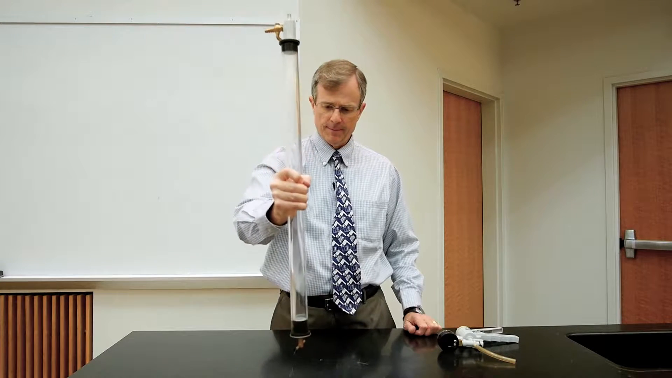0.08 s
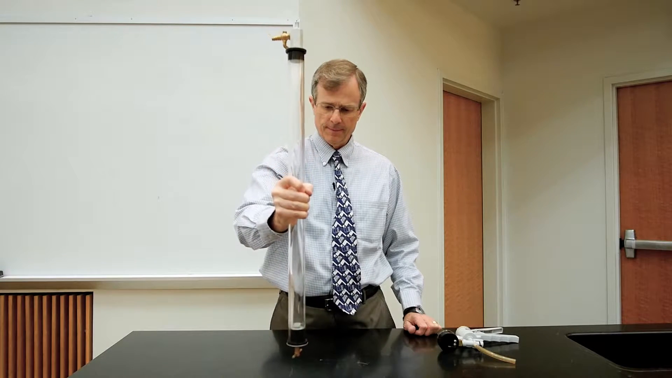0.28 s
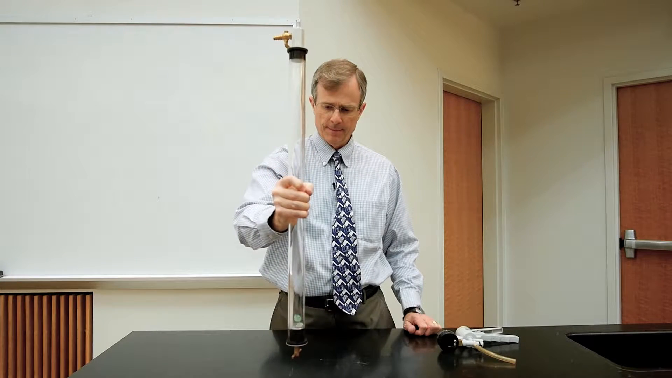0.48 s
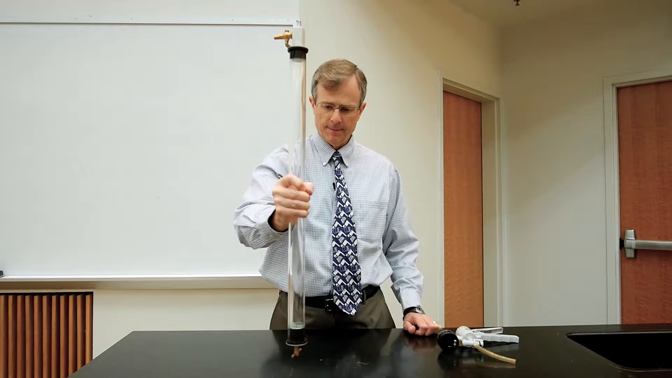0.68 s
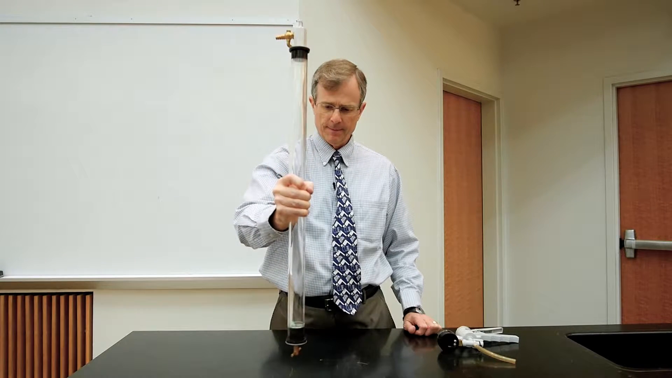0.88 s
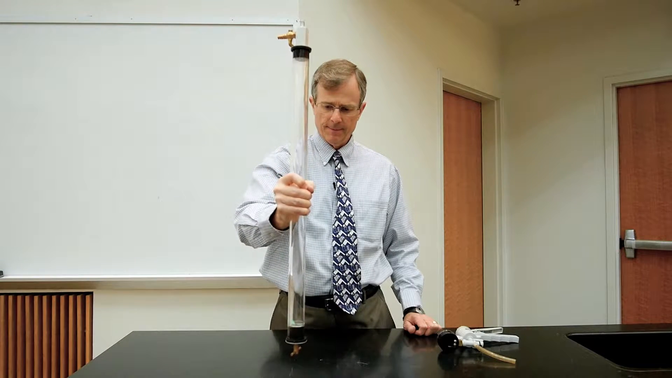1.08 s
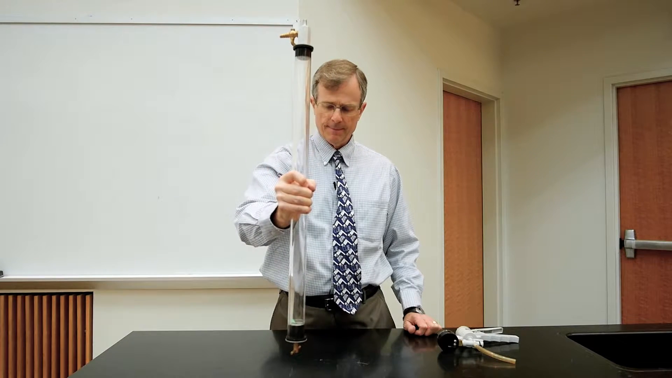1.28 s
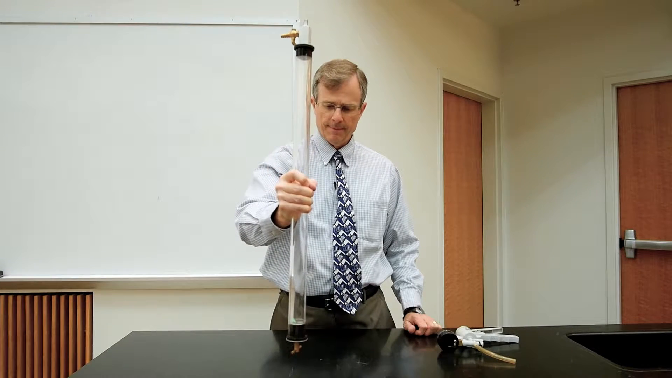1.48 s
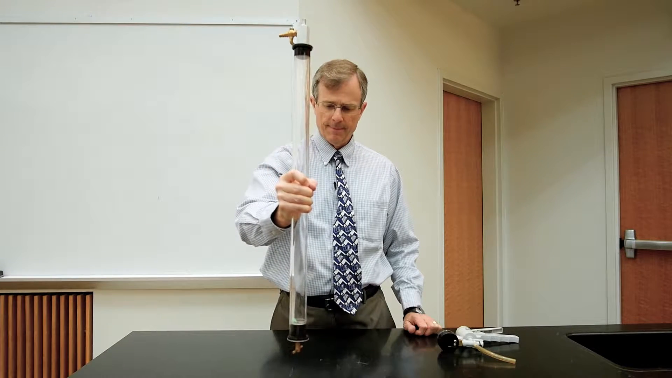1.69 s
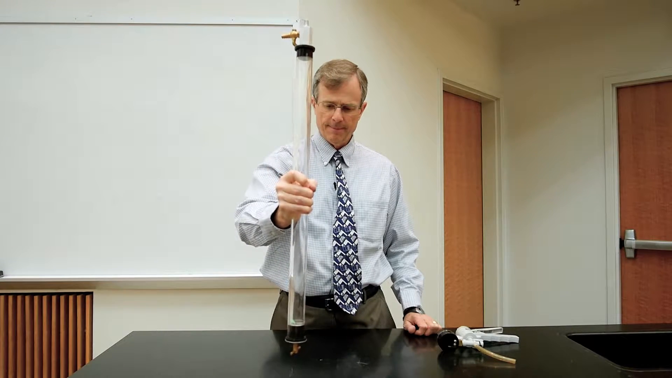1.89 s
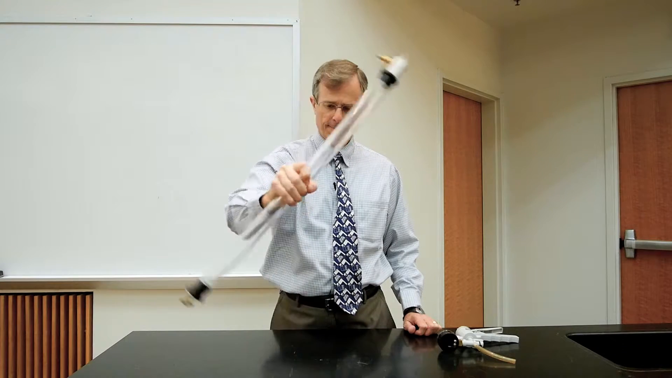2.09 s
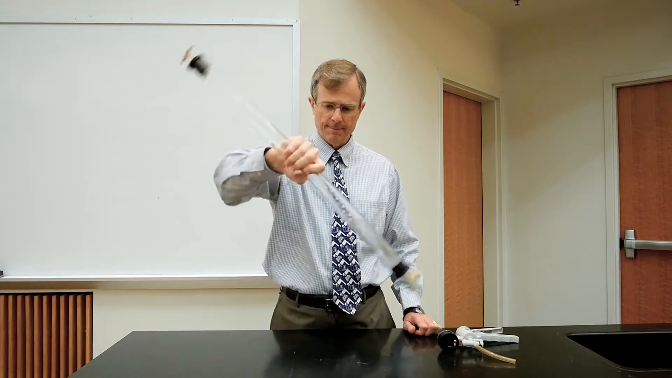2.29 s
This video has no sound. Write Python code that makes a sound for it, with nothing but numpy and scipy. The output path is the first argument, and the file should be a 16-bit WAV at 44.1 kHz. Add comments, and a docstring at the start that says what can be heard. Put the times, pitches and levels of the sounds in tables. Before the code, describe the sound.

A coin and loose bits clack hard, then rattle and click inside a hand-held glass tube

```python
"""Ventilation rumble and hiss, shaped from random noise, lie below a coin and loose pieces in a hand-held glass tube.
Five dull ticks, each a sum of damped modes with a ring near 3 kHz, come first. A hard double blow, bounces and bursts
of small clicks follow: taps ring damped modes of the glass, and some blows also knock the tube's end.
Each contact returns once from the bench and fades in the lecture room as a diffuse tail of decaying noise.
A swish of filtered noise rises to the end as the tube swings."""
import sys
import numpy as np
from scipy import signal
from scipy.fft import rfft, irfft
from scipy.io import wavfile
from scipy.ndimage import uniform_filter1d

SR = 44100
rng = np.random.default_rng(int(sys.argv[2]) if len(sys.argv) > 2 else 0)


def digitize_waveform(pressure):
    """Quantize a signal to 16-bit integers and store it at the path in sys.argv[1].

    Rows of a 2-D input are taken as channels; values are limited to [-1, 1].
    """
    field = np.atleast_2d(pressure).T
    bounded = np.clip(field, -1, 1)
    quanta = np.round(bounded * 32767).astype(np.int16)
    wavfile.write(sys.argv[1], SR, quanta)


def volts_from_decibels(level):
    """Turn decibel levels (scalar or array-like) into linear amplitude factors."""
    exponent = np.asarray(level, float) / 20
    return 10 ** exponent


N = 101430
T = np.arange(N) / SR  # time [s]
CONTACT_S = 0.00009  # rise time of a hard contact on glass
MID_TAP_DB = -28  # strength of the middle tap, the reference for hardness


def set_rms(x, db):
    """Level: scale a signal to an rms value in dB re full scale."""
    return x * volts_from_decibels(db) / np.sqrt(np.mean(x ** 2))


def colour(x, points):
    """Linear filtering: gains at (frequency [Hz], gain [dB]) points, joined along log frequency."""
    hz, db = np.array(points).T
    f = np.arange(len(x) // 2 + 1) * SR / len(x) + 1  # 1 Hz up, to avoid log(0)
    gain_db = np.interp(np.log(f), np.log(hz), db)
    return irfft(rfft(x) * volts_from_decibels(gain_db), len(x))


def walk(rate):
    """Slow fluctuation: random steps, rate per second, smoothed twice to a spread near 0.3."""
    k = int(SR / rate)
    steps = np.repeat(rng.standard_normal(N // k + 1), k)
    smooth = uniform_filter1d(uniform_filter1d(steps, k), k)
    return 0.43 * smooth[:N]


def add(out, sound, s):
    """Superposition: mix a sound in at time s."""
    i = int(s * SR)
    out[i:i + len(sound)] += sound[:N - i]


def strike(modes, contact_s, chance):
    """Modal synthesis: damped sines rise over the contact time, their levels scattered by chance."""
    scatter_db = 2
    # a long first decay gets 35 ms, any other 12 ms
    t = T[:1536] if modes[0][2] > 0.012 else T[:512]
    ring = 0
    for k, (hz, db, t60) in enumerate(modes):
        sign = (-1) ** k
        decay = np.exp(-np.log(1000) * t / t60)
        ring = ring + sign * volts_from_decibels(db + scatter_db * chance[k]) * np.sin(2 * np.pi * hz * t) * decay
    rise = 1 - np.exp(-(t / contact_s) ** 2)
    return rise * ring


def air():
    """Broadband flow noise: ventilation rumble and hiss, gently flickering in level."""
    # Ventilation spectrum: (frequency [Hz], relative density [dB per Hz])
    air_spectrum = [(12, -61), (20, -26), (31, -16.5), (53, -15), (75, 0), (104, -4), (134, -1.5),
                    (216, -2.5), (249, -4), (516, -10.5), (743, -12.5), (1100, -22.5), (3280, -37.5),
                    (14900, -44.5), (16200, -48)]
    air_db, flicker_db = -43, 1.0
    noise = colour(rng.standard_normal(N), air_spectrum)
    return set_rms(noise * volts_from_decibels(flicker_db * walk(6)), air_db)


def swish():
    """Exponential growth of noise: a soft rustle rises steadily in dB as the tube is swung round."""
    # Rustle spectrum: (frequency [Hz], relative density [dB per Hz])
    swish_spectrum = [(500, -12.5), (1500, 6.5), (4000, -5), (9000, -9), (16000, -15)]
    end_db, rise_db_per_s, flicker_db = -57.5, 52, 1.7
    noise = set_rms(colour(rng.standard_normal(N), swish_spectrum), end_db)
    return noise * volts_from_decibels(rise_db_per_s * (T - N / SR) + flicker_db * walk(24.7))


def room(x):
    """Reflection and reverberation: one bench echo and a diffuse tail whose treble lasts longest."""
    # Colour of the room tail: (frequency [Hz], gain [dB])
    tail_colour = [(500, -6), (2000, 2), (5000, -1), (9000, -4.5), (16000, -5)]
    bench_s, bench_db = 0.0016, -20
    t60_s, top_t60_s = 0.5, 0.6  # towards the bass, and at 12 kHz
    tail_db, build_up_s = -22, 0.003
    t = T[:SR // 2]
    tail = 0
    for hz in 500 * 2 ** np.arange(0, 5.1, 0.5):  # half-octave bands
        band_edges = [(hz / 1.42, -40), (hz / 1.15, 0), (hz * 1.15, 0), (hz * 1.42, -40)]
        band = colour(rng.standard_normal(len(t)), band_edges)
        rate = 1 / t60_s + (1 / top_t60_s - 1 / t60_s) * (hz / 12000) ** 2
        tail = tail + band * np.exp(-np.log(1000) * t * rate)
    tail = colour(tail, tail_colour) * (1 - np.exp(-(t / build_up_s) ** 2))
    tail = tail * volts_from_decibels(tail_db) / np.sqrt(np.sum(tail ** 2))  # sets the energy of the response
    bench = volts_from_decibels(bench_db) * np.roll(x, int(bench_s * SR))
    return x + bench + signal.fftconvolve(x, tail)[:N]


def ticks():
    """Soft impact: a longer contact of a softer piece gives dull ticks with a short ring near 3 kHz."""
    # Ticks of the softer piece: (time [s], level [dB], ring frequency [Hz], upper modes [dB])
    tick_events = [(.0088, -54, 3150, -14), (.0214, -40.5, 3150, -4), (.0446, -45, 3050, -1),
                   (.0664, -40.5, 3015, 4.5), (.0933, -40.5, 3010, 0.5)]
    # Upper modes of a tick: (frequency [Hz], relative level [dB], decay time T60 [s])
    upper_modes = [(3630, -1.5, 0.0068), (4530, -4, .005), (5500, -6, .005), (8200, -16, 0.0036)]
    ring_t60_s, contact_s = 0.019, 0.0003
    out = np.zeros(N)
    for s, db, hz, upper_db in tick_events:
        modes = [(hz, 0, ring_t60_s)] + [(f, d + upper_db, t60) for f, d, t60 in upper_modes]
        chance = 0.42 * rng.standard_normal(5)
        add(out, volts_from_decibels(db) * strike(modes, contact_s, chance), s)
    return out


def contact(db, low_db, middle_db, top_db, pitch=1):
    """Modal excitation: the contact point sets each group's share, and hardness brightens the main modes."""
    # Modes of the glass in groups: (frequency [Hz], relative level [dB], decay time T60 [s])
    low_modes = [(3250, -4.5, 0.0057), (4070, -3, 0.0034), (4340, -3.5, 0.0054), (4780, -9, 0.0043)]
    middle_modes = [(5430, -4.5, .007), (6590, -4, 0.0064)]
    main_modes = [(6880, -8.5, .004), (7940, -1, 0.0035), (8520, -2, 0.0038), (9010, 1, 0.0032),
                  (10130, -7, 0.002)]
    top_modes = [(11400, -10, .003), (12000, -2, .003), (13900, -4.5, .003), (15500, -13, .003)]
    # Modes that stop growing once a tap is harder than the middle one, same columns
    soft_modes = [(2480, -10, 0.0044), (15600, -17, 0.0023)]
    tap_gain_db, tilt_per_octave = 5, 1.1  # tilt [dB per octave per dB of hardness]
    hardness_db = db - MID_TAP_DB
    pivot_hz = main_modes[2][0]
    tilted = [(hz, d + tilt_per_octave * hardness_db * np.log2(hz / pivot_hz), t60)
              for hz, d, t60 in main_modes]
    groups = (low_modes, middle_modes, tilted, top_modes, soft_modes)
    shares_db = (low_db, middle_db, 0, top_db, min(0, -hardness_db))
    ring = 0
    for modes, share_db, chance in zip(groups, shares_db, rng.standard_normal((5, 5))):
        pitched = [(hz * pitch, d, t60) for hz, d, t60 in modes]
        ring = ring + volts_from_decibels(share_db) * strike(pitched, CONTACT_S, chance)
    return volts_from_decibels(db + tap_gain_db) * ring


def rattles():
    """Poisson process: sliding, settling pieces make dense faint contacts of random time, size and place."""
    # Bursts: (start [s], length [s], contact rate [per s],
    #          starting level [dB, before the tap gain], top modes [dB])
    bursts = [(0.252, 0.09, 1280, -59, 1), (0.344, 0.039, 1630, -55, -8), (0.381, 0.087, 1600., -58, -26),
              (.497, 0.024, 700., -57, -12), (.556, 0.026, 600., -57.5, -12),
              (0.608, 0.0357, 500., -57.5, -12), (.655, 0.041, 300., -64, -12)]
    fade_db_per_s = 60
    pitch_spread = 0.148  # loose pieces differ in size, so in pitch
    out = np.zeros(N)
    for s, length, rate, db, top_db in bursts:
        times = s + np.cumsum(rng.exponential(1, 120)) / rate
        scatter = 3.3 * rng.standard_normal((120, 3))  # dB
        pitches = 1 - pitch_spread * rng.random(120)
        for at, pitch, (size_db, low, middle) in zip(times, pitches, scatter):
            if at >= s + length:
                break
            click = contact(MID_TAP_DB, low + 1.3, middle + 1.47, top_db, pitch)
            click_db = db + size_db - fade_db_per_s * (at - s)
            add(out, volts_from_decibels(click_db - MID_TAP_DB) * click, at)
    return out


def knocks():
    """Structural excitation: some blows also knock the tube's end, ringing lower modes and a thump."""
    # Knocks: (time [s], level [dB], thump relative to the knock [dB])
    knock_events = [(0.2417, -20.5, 1.5), (0.244, -21.5, -14), (.2777, -16.5, -14), (0.3417, -34.5, -20),
                    (0.568, -44, -12)]
    # Modes of knock and thump: (frequency [Hz], relative level [dB], decay time T60 [s])
    knock_modes = [(900, 0.5, 0.003), (1480, 4.5, 0.0037), (2080, -6, 0.0056)]
    thump_modes = [(357, 0.5, 0.011), (110, -4, 0.019)]
    out = np.zeros(N)
    for s, db, thump_db in knock_events:
        add(out, volts_from_decibels(db + thump_db) * strike(thump_modes, 4 * CONTACT_S, np.zeros(2)), s)
        add(out, volts_from_decibels(db) * strike(knock_modes, 2 * CONTACT_S, rng.standard_normal(3)), s)
    return out


def taps():
    """Impact of hard bodies: separate taps of coin and pieces ring the modes of the glass."""
    # Taps: (time [s], strength [dB, before the tap gain], low modes [dB], middle modes [dB], top modes [dB])
    # The last three tell which modes the contact point drives.
    tap_events = [(0.2422, -13.5, -3.5, -17, -4), (0.243, -19, 0.5, 6, 4), (0.2436, -12.5, -20.5, -7, 0.5),
                  (0.2462, -12.5, -2, -11, -13), (0.2591, -21.5, -29, -3.5, -2), (0.2622, -33, -25, -3, -1),
                  (0.2672, -50, -3, 0.5, 0), (0.2775, -9.5, -5.5, -12, -22.5),
                  (0.2795, -21, -4.5, -10, -18.5), (0.2835, -31, -20, -1, -11), (0.2925, -50, 2, 1, 0),
                  (0.295, -38, 4, -6, -4), (0.298, -42.5, 7.5, -7.5, 14), (0.3337, -22, -11.5, -8, -11),
                  (0.339, -26.5, 0, -5, -7), (0.3403, -28.5, 1, -1, -13.5), (0.3439, -29.5, -21, -18, -9),
                  (0.347, -53, -16, 9, -6), (0.3596, -47, 6, 6, -11), (0.3845, -39.5, -22, -12, -25),
                  (0.4345, -50, -3, -5, -9), (0.4336, -40, -16, -9, -11), (0.4362, -44.5, -7, -9, -13),
                  (0.439, -53.5, -8, -4, -13), (0.4402, -51, -7, -5, -14), (0.442, -50.5, -1, 3, -10.5),
                  (0.4444, -50, 9, 1, -10), (0.499, -39, -15, -8, -15.5), (0.5016, -43, -8, -11, -18),
                  (0.5029, -44, -19.5, -12, -13), (0.506, -41, -17, -8, -9), (0.5085, -39.5, -7, -4, -13),
                  (0.5115, -39, -6.5, -2, -13), (0.5136, -44.5, -8, -7, -12), (0.518, -62, -2, -6, -7),
                  (0.558, -51, -9, -14, -12), (0.5622, -45, -7, -5, -11), (0.564, -42, -15, -7, -11),
                  (0.5701, -28, -9, -5, -11.5), (0.5718, -35, -8, -6, -7), (0.5765, -37.5, -14, -7, -15),
                  (0.5777, -41, -15, -13, -11), (0.5878, -66.5, -6, 4, 3), (0.5997, -57, -5, -11, -10),
                  (0.6032, -66, -16, -12, -8), (0.6112, -62, -2, -3, -5), (0.613, -53, -4, 2, -7),
                  (0.6182, -39, -20, -4, -17), (0.6229, -37, -18, -10, -19), (0.6244, -38.5, -15, -13, -14),
                  (0.6265, -41, -16, -13, -17), (0.6288, -45, -11, -8, -15), (0.6385, -58, -9, -13, -12),
                  (0.6535, -31.5, -25, -7, -19), (0.665, -34, -23, -5, -11),
                  (0.6692, -42.5, -3.5, -10, -13), (0.6736, -43, -14, -12, -11),
                  (0.6842, -32.5, -20, -9, -15), (0.702, -30.5, -12, -6.5, -2), (0.7036, -36, -9, -12, -12),
                  (0.7165, -34.5, -13, -4.5, -8), (0.7227, -43.5, -12, -8, -12)]
    out = np.zeros(N)
    for s, *strength in tap_events:
        add(out, contact(*strength), s)
    return out


def scene():
    """Superposition: the tube's contacts in the room over ventilation and swish, in one channel."""
    contacts = ticks() + rattles() + knocks() + taps()
    return (room(contacts) + air() + swish())[None]


def roll_off(x):
    """The treble ends steeply here."""
    return signal.sosfilt(signal.butter(12, 16670, fs=SR, output="sos"), x)


def record(dry):
    """Band limitation: the recorder cuts the top with a steep low-pass at 16 kHz."""
    low_pass = signal.butter(8, 16000, fs=SR, output="sos")
    mix = signal.sosfilt(low_pass, dry)
    return roll_off(mix)


dry = scene()
out = record(dry)
digitize_waveform(out)
```